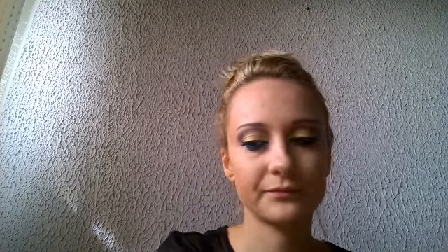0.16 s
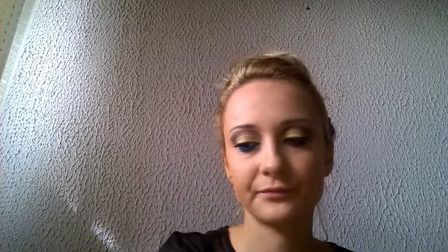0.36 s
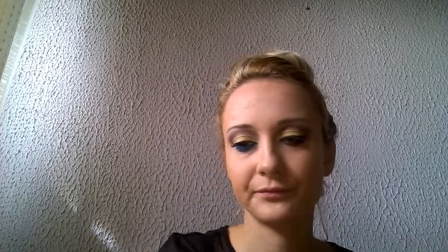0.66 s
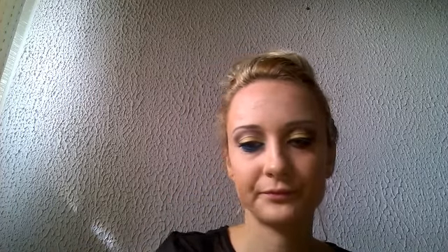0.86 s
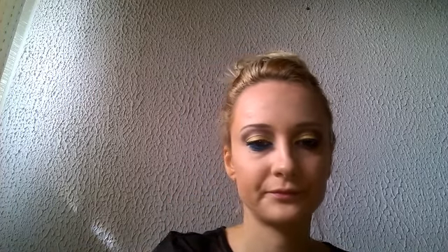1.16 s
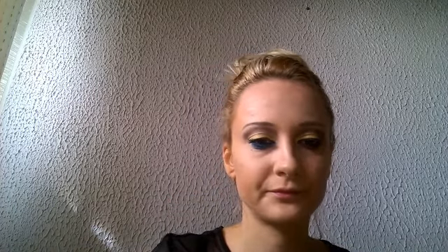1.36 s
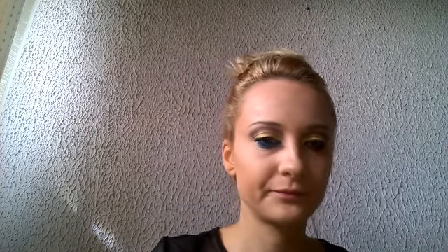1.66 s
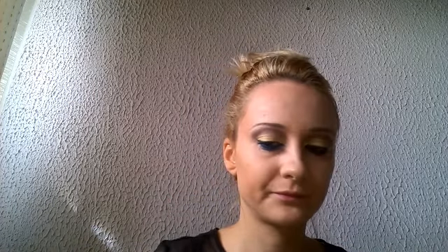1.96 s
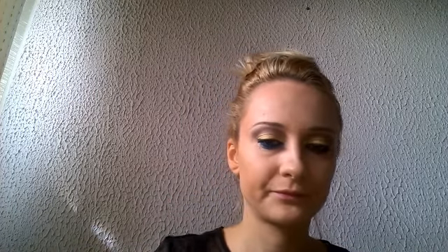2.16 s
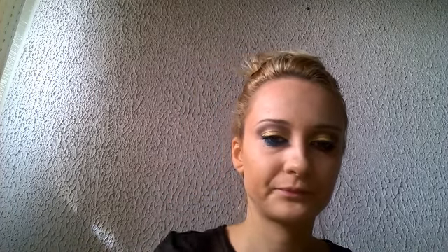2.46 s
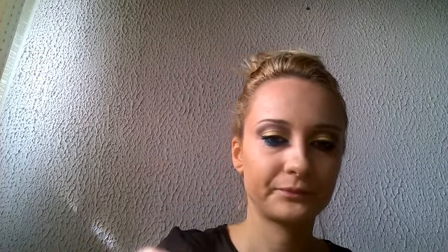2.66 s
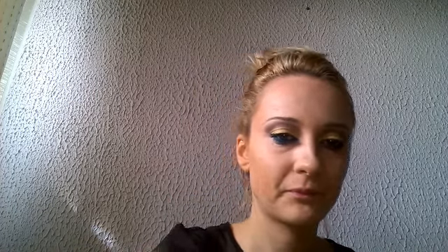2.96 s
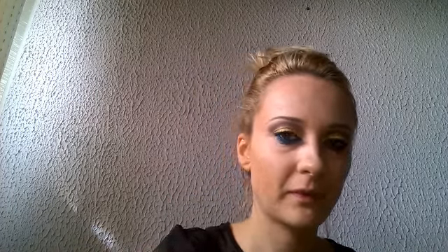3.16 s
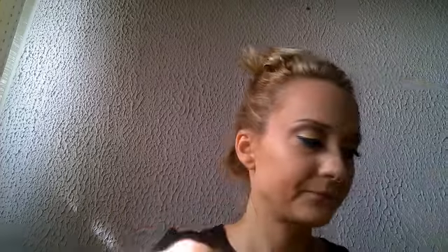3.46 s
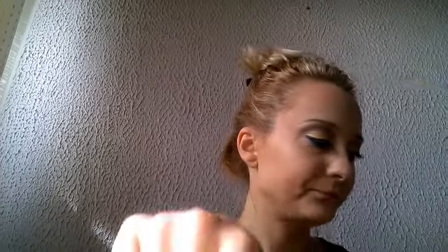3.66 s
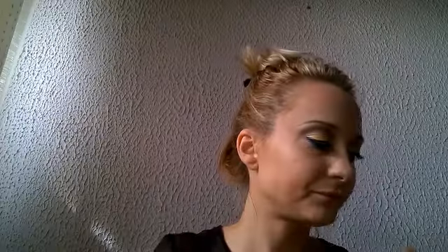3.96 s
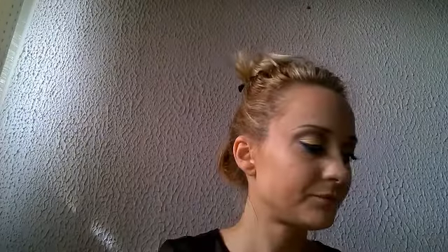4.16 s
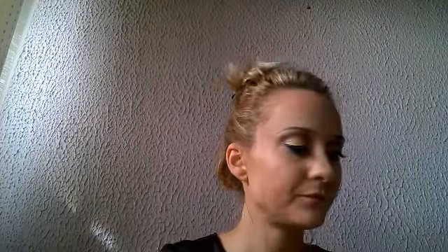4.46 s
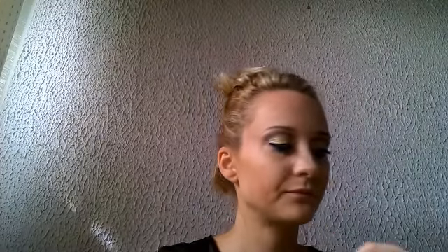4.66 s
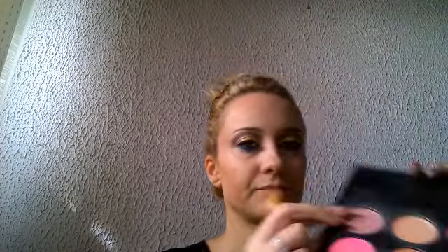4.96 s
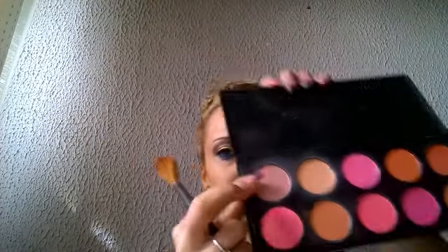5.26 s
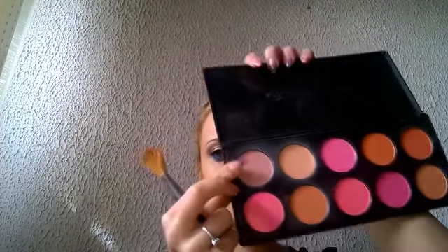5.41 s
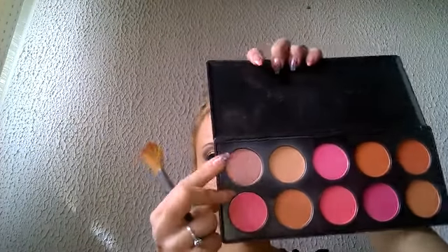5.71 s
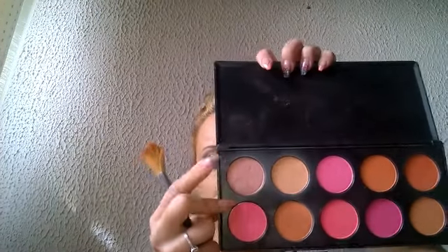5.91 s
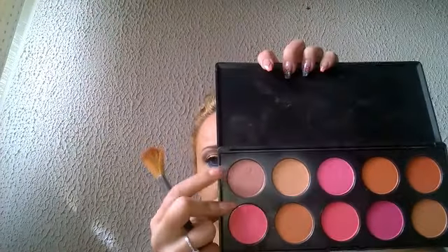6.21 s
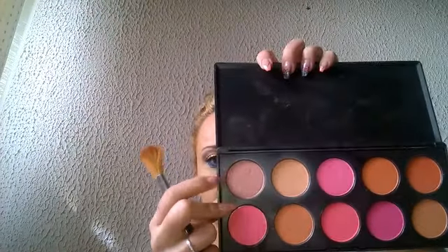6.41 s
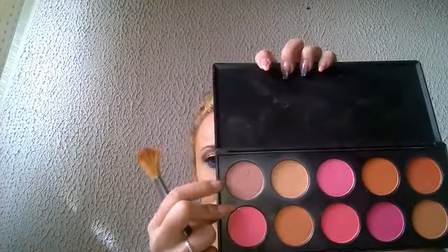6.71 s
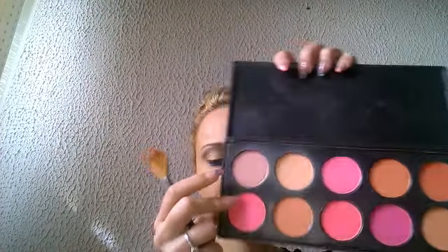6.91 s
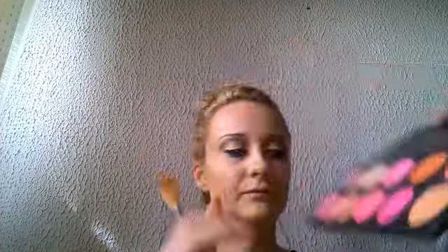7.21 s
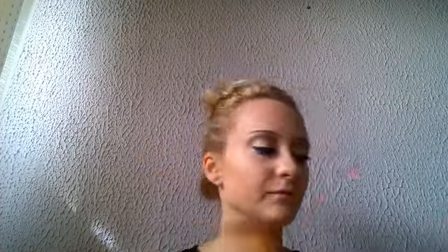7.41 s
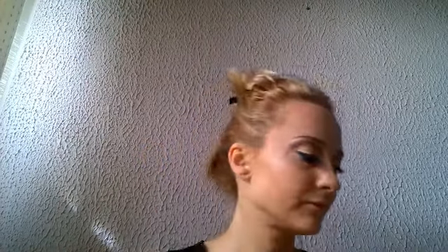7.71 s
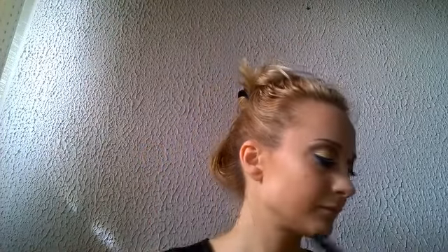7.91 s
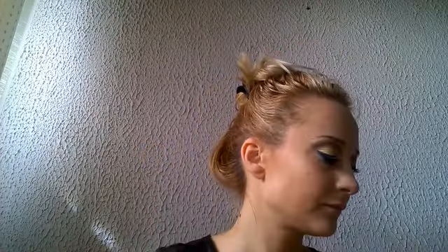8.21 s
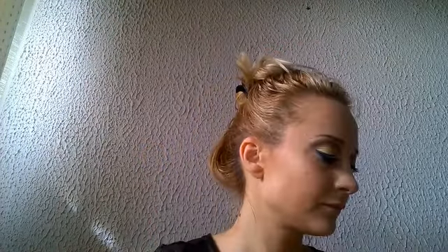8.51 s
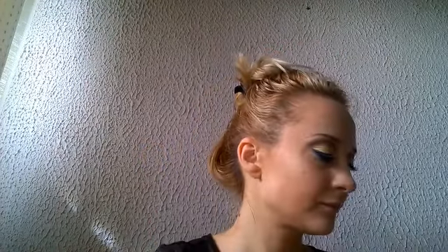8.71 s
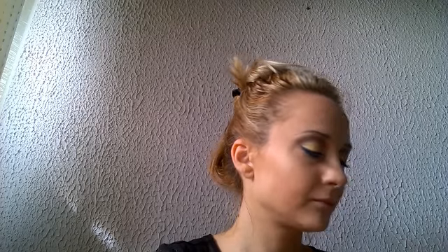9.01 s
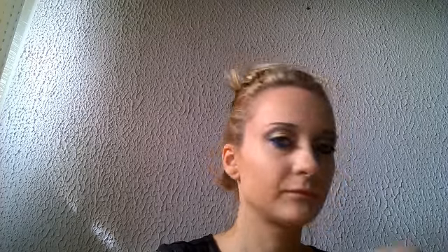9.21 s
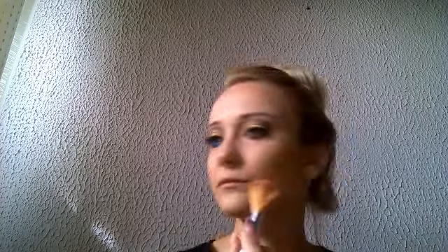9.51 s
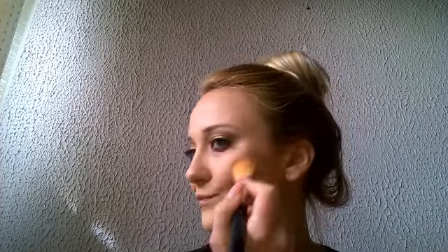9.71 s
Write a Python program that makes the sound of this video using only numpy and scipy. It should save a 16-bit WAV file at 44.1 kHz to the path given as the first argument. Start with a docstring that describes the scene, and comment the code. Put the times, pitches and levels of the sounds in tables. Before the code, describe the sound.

Hard plastic case knocks sharply on a desk, then light clicks, rattles and short scrapes of makeup items in a small quiet room, fading to soft shuffles.

```python
"""Small quiet room, at a desk: a plastic makeup palette and some brushes are handled. Hard case knocks, light
clicks and dull bumps are noise bursts with short decays; knocks add ringing sine modes. Slides are noise with
tiny catches, shuffles are dull noise, sways are low sine swells. All but the sways and the floor get dense,
decaying noise echoes; a faint wavering rumble and steady hiss lie below."""
import sys
import numpy as np
from scipy import signal
from scipy.fft import rfft, irfft
from scipy.io import wavfile

SR = 44100
rng = np.random.default_rng(int(sys.argv[2]) if len(sys.argv) > 2 else 0)


def master(y):
    """Save y as 16-bit WAV."""
    cut = np.clip(np.atleast_2d(y).T, -1, 1)
    pcm = np.round(cut * 32767)  # scale
    wavfile.write(sys.argv[1], SR, pcm.astype(np.int16))


N = 435266

SIZE = 2 ** 15   # samples per contact
AGE_S = np.arange(SIZE) / SR
HZ = np.maximum(np.fft.rfftfreq(SIZE, 1 / SR), 1)


def from_db(db):
    """Decibels to gain."""
    return 10 ** (np.asarray(db) / 20)


def rms_one(x):
    """Scale to an rms of 1."""
    return x / np.sqrt(np.mean(x ** 2) + 1e-20)


def at_hz(points, hz):
    """Read (Hz, value) points on a log-frequency axis."""
    point_hz, values = np.array(points).T
    return np.interp(np.log(hz), np.log(point_hz), values)


def dying(t60_s):
    """Exponential decay, 60 dB down after t60_s."""
    return np.exp(-np.log(1000) * AGE_S / max(t60_s, 1e-3))


def add(track, start_s, sound):
    """Mix a sound into the track at start_s."""
    start = max(round(start_s * SR), 0)
    track[start:start + len(sound)] += sound[:N - start]


def coloured(x, gain_db):
    """Minimum-phase filter with the given gain at each of HZ: nothing sounds early."""
    cepstrum = irfft(np.log(from_db(gain_db)))
    cepstrum[1:SIZE // 2] *= 2
    cepstrum[SIZE // 2 + 1:] = 0
    return irfft(rfft(x) * np.exp(rfft(cepstrum)))


def broad_db(x, count=12):
    """Spectrum level, averaged over about 1 / count of each frequency to either side."""
    total = np.cumsum(np.abs(rfft(x)) ** 2)
    k = np.arange(len(HZ))
    low = np.maximum(k - k // count - 20, 0)
    high = np.minimum(k + k // count + 20, k[-1])
    return 10 * np.log10((total[high] - total[low]) / (high - low) + 1e-12)


def peaks_db(resonances):
    """Gain at each of HZ of resonances (Hz, width in Hz, dB) that stand out of an even response."""
    power = 1
    for hz, width_hz, db in resonances:
        height = from_db(max(db, 0)) ** 2 - 1
        power = power + height / (1 + (2 * (HZ - hz) / width_hz) ** 2)
    return 10 * np.log10(power)


def spot_db(low_hz, middle_hz, high_hz, height_db):
    """The spot that is struck favours three damped resonances of the part."""
    return peaks_db([(hz, hz / 12, height_db) for hz in (low_hz, middle_hz, high_hz)])


def touch_db(thud_db, hollow_db, snap_db):
    """Where and how hard plastic is touched sets its bass, its hollow middle and its treble."""
    return at_hz([(260, thud_db), (750, hollow_db), (1700, 0), (3600, 0), (7000, snap_db)], HZ)


def soft_db(dull_hz, low_hz=105):
    """A soft contact only moves the low range of the desk."""
    return -10 * np.log10((1 + (HZ / dull_hz) ** 6) * (1 + (low_hz / HZ) ** 6))


def crack(t60_s, tick, treble_hz=4500, treble_share=.55):
    """A first tick, then crowded modes of a small part, the high ones dying first; spectrum flattened."""
    noise = rng.standard_normal(SIZE)
    low = signal.sosfilt(signal.butter(2, treble_hz, fs=SR, output="sos"), noise)
    high = signal.sosfilt(signal.butter(2, treble_hz, "high", fs=SR, output="sos"), noise)
    burst = low * dying(t60_s) - high * dying(t60_s * treble_share)
    burst /= np.linalg.norm(burst)
    burst[0] += tick
    return coloured(burst, -broad_db(burst))


def stroke(length_s, edge=0.23):
    """A movement swells, holds and fades, silent after 1.1 of length_s."""
    share = AGE_S / max(length_s, .01)
    return np.sqrt(np.clip(np.minimum(share, 1.1 - share) / edge, 0, 1))


# Rumble and hiss spectrum. Each row: frequency in Hz, relative density in dB.
FLOOR_SPECTRUM = [(20, -6), (50, -0.5), (70, -9), (100, -18.5), (190, -17), (350, -23.5), (550, -30),
                  (900, -30.5), (2000, -33.5), (4000, -35), (9000, -36), (12600, -35.5), (16000, -39)]


def floor(level_db=-59, waver_db=0.84, rumble_hz=400):
    """Steady hiss over a low rumble that wavers: shaped noise, its low share slowly modulated."""
    hz = np.maximum(np.fft.rfftfreq(N, 1 / SR), 1)
    spectrum = rfft(rng.standard_normal(N)) * from_db(at_hz(FLOOR_SPECTRUM, hz)) * (hz > 15)
    low_share = 1 / (1 + (hz / rumble_hz) ** 4)
    knots = rng.standard_normal(size=80)
    waver = from_db(waver_db * np.interp(np.arange(N), np.linspace(0, N, len(knots)), knots))
    rumble = irfft(spectrum * low_share, N) * waver
    hiss = irfft(spectrum * (1 - low_share), N)
    return from_db(level_db) * rms_one(rumble + hiss)


# Room decay. Each row: frequency in Hz, t60 in s.
ROOM_DECAY = [(100, 0.18), (260, 0.4155), (700, 0.06), (1900, 0.3357), (4800, 0.2164), (12800, 0.35)]
# Echo spectrum. Each row: frequency in Hz, relative level in dB.
ECHO_SPECTRUM = [(100, 1.5), (250, -3), (700, -6.5), (2000, -6.5), (4500, -9), (8000, -9), (14000, -13.5)]
# Standing waves between the walls. Each row: frequency in Hz, width in Hz, height in dB.
STANDING_WAVES = [(175, 61, 5.5), (236, 6.1, 6), (350, 16.17, 1.5), (448.6, 18, 2)]


def room(first_echo_s=0.0032, build_s=0.0069):
    """The room's answer to a click: dense echoes build up in milliseconds, each band with its own decay."""
    edges_hz = np.geomspace(60, 17000, 9)
    tail = np.zeros(SIZE)
    for low_hz, high_hz in zip(edges_hz, edges_hz[1:]):
        band_pass = signal.butter(2, [low_hz, high_hz], "band", fs=SR, output="sos")
        band = signal.sosfilt(band_pass, rng.standard_normal(SIZE))
        tail += band * dying(at_hz(ROOM_DECAY, np.sqrt(low_hz * high_hz)))
    tail *= np.clip((AGE_S - first_echo_s) / build_s, 0, 1)
    return coloured(tail, at_hz(ECHO_SPECTRUM, HZ) + peaks_db(STANDING_WAVES) - broad_db(tail))


def in_room(x, wet_db):
    """Direct sound plus its echoes, drawn afresh at each call."""
    return x + from_db(wet_db) * signal.fftconvolve(x, room())[:len(x)]


def chatter(blow, rattle_db=-13, rattle_t60_s=0.18, count=7):
    """Lid and pans are loose: after a hard blow they touch again several times, ever more weakly."""
    out = blow.copy()
    for delay_s in np.cumsum(rng.uniform(.003, .011, count)):
        touch = crack(t60_s=0.0061, tick=0.44)[:SIZE // 2]
        add(out, delay_s, from_db(rattle_db - 60 * delay_s / rattle_t60_s) * touch)
    return out


# Modes of case and desk. Each row: frequency in Hz, relative level in dB, t60 in s.
MODES = [(238.3, -59.5, 0.19), (880, -54, 0.18), (1138, -50, 0.18), (1190, -56, 0.18), (1680, -53.5, .16),
         (1900, -61, .2), (2080, -55, .21), (2250, -52, 0.23), (2612, -58, .2), (2969, -62.5, .19),
         (3270, -58.5, 0.14), (3430, -56.5, 0.18), (4130, -57.5, .16)]
# Heavy contact spectrum. Each row: frequency in Hz, relative level in dB.
HEAVY_SPECTRUM = [(30, -25), (80, -10.5), (130, 2.5), (700, 0.5), (2100, 2.5), (3200, -0.5), (4300, -6.5),
                  (5500, -15.5), (7000, -23.5), (9000, -22.5), (12000, -26.5), (16000, -35)]
HEAVY_SNAP_DB = -22   # snap already in that spectrum
# Case knocks on the desk. Each row: start in s, relative level in dB, thud in dB, hollowness in dB,
# snap in dB, ring t60 in s, three resonances in Hz, their height in dB.
CASE_KNOCKS = [(0.2042, 24.5, -7, -2.5, -23, 0.032, 876, 2072, 4000, 5),
               (0.407, -11, 9.5, 6.5, -17, 0.037, 720, 1630, 1700, 12.3),
               (0.5196, 3.5, 9, 10, -9.5, 0.041, 580, 1790, 3020, 5.3),
               (2.3721, 21.5, -3, -2, -26, 0.039, 1134, 2080, 3100, 4),
               (2.5235, 17.5, 5.5, 8, -15, .046, 242, 750, 1672, 7),
               (2.5604, 17, -4.5, 0.5, -24.5, 0.032, 1200, 1670, 2080, 4.3),
               (8.6933, -8.5, 3, 8.5, -12.5, 0.04, 740, 3460, 5600, 8.2)]


def knocks(room_db=-1.05):
    """Each knock cracks, rattles and rings case and desk; each lands elsewhere, with echoes of its own."""
    out = np.zeros(N)
    modes = np.array([from_db(db) * np.sin(2 * np.pi * hz * AGE_S) * dying(t60_s)
                      for hz, db, t60_s in MODES])
    for start_s, level_db, thud_db, hollow_db, snap_db, t60_s, *spot in CASE_KNOCKS:
        strengths = from_db(rng.normal(-3.0, 1.7, len(modes))) * rng.choice([-1, 1], len(modes))
        rattle = chatter(crack(t60_s, tick=.2))
        blow = coloured(rattle, -broad_db(rattle)) + strengths @ modes
        touch = touch_db(thud_db, hollow_db, snap_db - HEAVY_SNAP_DB)
        colour_db = at_hz(HEAVY_SPECTRUM, HZ) + touch + spot_db(*spot)
        add(out, start_s, in_room(coloured(blow, level_db + colour_db), room_db))
    return out


# Soft bumps on the desk, some the low thump under a case knock. Each row: start in s, relative level in dB.
DESK_BUMPS = [(0.523, 10.5), (1.004, 1), (1.121, -0.5), (2.917, 4.5), (4.167, 0), (5.939, -0.5),
              (7.365, -7), (8.70, -1)]


def bumps(dull_hz=169):
    """The desk top is bumped, alone or under a knock: a short burst with only its low range left."""
    out = np.zeros(N)
    for start_s, level_db in DESK_BUMPS:
        add(out, start_s, coloured(crack(t60_s=0.064, tick=1.0), level_db + soft_db(dull_hz)))
    return out


# Sways of the desk. Each row: start in s, length in s, frequency in Hz, level in dB.
DESK_SWAYS = [(0.637, 0.24, 31.5, -44), (4.325, .1, 63, -48), (7.997, 0.19, 52.5, -54.5),
              (8.796, 0.17, 32, -48.5)]


def sway():
    """The swaying desk shakes the microphone directly: a low sine under a half-sine swell."""
    out = np.zeros(N)
    for start_s, length_s, hz, level_db in DESK_SWAYS:
        swell = np.sin(np.pi * np.minimum(AGE_S / length_s, 1))
        add(out, start_s, from_db(level_db) * np.sin(2 * np.pi * hz * AGE_S) * swell)
    return out


# Light contact spectrum. Each row: frequency in Hz, relative level in dB.
LIGHT_SPECTRUM = [(30, -17), (80, -8.5), (140, 3), (700, 1.5), (1800, 2), (3000, -0.5), (4300, -3.5),
                  (6000, -8), (9000, -11.5), (12000, -11), (16000, -15.5)]
LIGHT_SNAP_DB = -12   # snap already in that spectrum
# Broad resonances of the thin plastic shell. Each row: frequency in Hz, width in Hz, height in dB.
SHELL_RESONANCES = [(940, 310, 2), (1890, 310, 1.5), (2930, 180, 2.5), (3864, 350, 3), (5050, 420, 3),
                    (7900, 580, 2), (11100, 2080, 1)]


def light_shell_db():
    """A light contact excites the broad resonances of the thin shell."""
    return at_hz(LIGHT_SPECTRUM, HZ) + peaks_db(SHELL_RESONANCES)


# Sound of each touched part. Each entry: thud in dB, hollowness in dB, snap in dB, ring t60 in s,
# three resonances in Hz, their height in dB.
TOUCHED_PARTS = {"nail": (3, 3.5, 5.5, 0.18, 7700, 10301, 12600, 4.5),
                 "lid": (-13, -5, -10, 0.07, 1879.5, 3050, 4981.5, 6.5),
                 "hinge": (-14, 1, -12, 0.03, 2600, 3250, 3900, 8),
                 "handle": (8.5, -2, -6.5, 0.13, 852, 2702, 3550, 10.5),
                 "rim": (-0.5, 1.5, -18, 0.08, 830, 1856, 2850, 6),
                 "tray": (6, 12, -15, 0.18, 734, 900, 1200, 6.5),
                 "base": (6.5, -1, -28, .06, 1140, 1830.5, 3550, 7)}
# Light clicks. Each row: start in s, relative level in dB, extra snap of a sharper touch in dB, part.
LIGHT_CLICKS = [(.988, -17.5, -14, "handle"), (0.9984, -3, 0, "handle"), (1.1223, -18, 3, "tray"),
                (1.163, -12.5, 7, "base"), (1.2356, -20, 7, "tray"), (1.327, -22.5, 4, "rim"),
                (1.3989, -18.5, 3, "rim"), (2.229, -17.5, -5, "base"), (2.272, -11, 3, "lid"),
                (2.8314, -7.5, -1, "hinge"), (2.8533, -11, -2, "handle"), (2.869, -10.5, 3, "handle"),
                (2.8901, -15, -3, "hinge"), (2.905, -17, 8.5, "tray"), (3.0482, -4.5, 4, "rim"),
                (3.0922, -15.5, 5, "hinge"), (3.1485, -9.5, 6, "base"), (3.3128, -7.5, 3, "base"),
                (3.4065, 0, -1, "hinge"), (3.4346, -3, -1, "rim"), (3.448, -22, 4.5, "handle"),
                (3.5078, -13, 2, "rim"), (3.742, -7, -8, "nail"), (4.137, -24.5, 0, "tray"),
                (4.254, -29, -8, "tray"), (4.466, -12, -2, "rim"), (5.512, -20, -9, "hinge"),
                (5.597, -29, -8, "tray"), (6.5868, -6.5, 2, "lid"), (6.754, -9.5, 0.5, "lid"),
                (6.955, -22.5, 3, "hinge"), (7.065, -22, -11, "rim"), (7.691, -31.5, 4, "nail"),
                (7.93, -36.5, 2, "nail"), (8.322, -25, -1.5, "nail"), (8.345, -27.5, 12, "tray"),
                (8.535, -25.5, 4, "tray"), (9.428, -33.5, 3, "nail")]


def clicks():
    """Light contacts leave the desk still; the part that is touched sets colour and ring."""
    out = np.zeros(N)
    shell_db = light_shell_db()
    for start_s, level_db, sharper_db, part in LIGHT_CLICKS:
        thud_db, hollow_db, snap_db, t60_s, *spot = TOUCHED_PARTS[part]
        touch = touch_db(thud_db, hollow_db, snap_db + sharper_db - LIGHT_SNAP_DB)
        colour_db = shell_db + touch + spot_db(*spot)
        add(out, start_s, coloured(crack(t60_s, tick=0.38), level_db + colour_db))
    return out


# An edge scrapes thinly, a flat face rubs hollowly. Each entry: thud in dB, hollowness in dB,
# snap in dB, height of the favoured resonance in dB.
RUBBING_GRIPS = {"edge": (6.5, 4, -11.5, 8.5), "face": (11, 8, -22, 10.5), "finger": (-5, 3.5, -9.5, 7)}
# Plastic slides over desk and skin. Each row: start in s, length in s, relative level in dB,
# favoured resonance in Hz, what rubs.
PLASTIC_SLIDES = [(1.099, .16, -53.5, 1210, "face"), (1.237, 0.078, -52.5, 550, "face"),
                  (1.331, 0.077, -54, 1790, "face"), (2.849, 0.065, -51.5, 860, "face"),
                  (2.99, 0.091, -48, 2860, "edge"), (3.08, 0.089, -46.5, 1220, "face"),
                  (3.248, 0.076, -45.5, 5160, "edge"), (3.41, 0.022, -41.5, 1160, "face"),
                  (3.469, 0.17, -51.5, 2850, "edge"), (3.638, 0.063, -46, 1660, "face"),
                  (3.96, .13, -55.5, 2000, "finger"), (4.381, 0.073, -53, 744, "face"),
                  (4.469, 0.042, -52, 2300, "finger"), (4.752, 0.063, -51.5, 1900, "finger"),
                  (4.99, 0.095, -53, 1600, "finger"), (5.572, .22, -61, 3700, "edge"),
                  (6.907, 0.18, -60.5, 1900, "finger"), (8.489, .085, -54.5, 2890, "edge")]


def slides(catches_per_s=220, spread_db=4.5, smooth=0.92, width_share=0.19):
    """Friction: a smooth rub and tiny uneven catches; each stroke favours one resonance of the shell."""
    out = np.zeros(N)
    shell_db = light_shell_db()
    for start_s, length_s, level_db, hz, grip in PLASTIC_SLIDES:
        thud_db, hollow_db, snap_db, height_db = RUBBING_GRIPS[grip]
        sizes = from_db(spread_db * np.minimum(rng.exponential(1, SIZE), 3))
        catches = (rng.random(SIZE) < catches_per_s / SR) * sizes * rng.choice([-1, 1], SIZE)
        friction = rms_one(rms_one(catches) + smooth * rng.standard_normal(SIZE))
        touch = touch_db(thud_db, hollow_db, snap_db - LIGHT_SNAP_DB)
        colour_db = shell_db + touch + peaks_db([(hz, hz * width_share, height_db)])
        add(out, start_s, coloured(friction * stroke(length_s), level_db + colour_db))
    return out


# Dull shuffles as the sitter shifts. Each row: start in s, length in s, relative level in dB.
SITTER_SHUFFLES = [(4.8, 0.13, -52), (5.972, 0.081, -48), (6.298, 0.32, -51), (6.752, 0.27, -57),
                   (7.318, .14, -55), (7.508, 0.074, -42), (9.251, .171, -51), (9.679, 0.19, -44.5)]


def shuffles(dull_hz=294, low_hz=139):
    """Shuffles pass through the desk top: swelling noise with only its low range left."""
    out = np.zeros(N)
    for start_s, length_s, level_db in SITTER_SHUFFLES:
        rub = rng.standard_normal(SIZE) * stroke(length_s)
        add(out, start_s, coloured(rub, level_db + soft_db(dull_hz, low_hz)))
    return out


def scene():
    """Knocks, light handling and dull desk sounds with echoes; sway and floor without."""
    handling = in_room(from_db(-1.38) * clicks() + from_db(-3.0) * slides(), wet_db=-1.1)
    desk = in_room(from_db(3.5) * (bumps() + shuffles()), wet_db=3.0)
    return (from_db(-1.5) * knocks() + handling + desk + sway() + floor())[None]


def record(dry, top=0.9, cutoff_hz=16000):
    """The loudest peaks are rounded and the top of the spectrum is cut."""
    rounded = top * np.tanh(dry / top)
    return signal.sosfilt(signal.ellip(10, .1, 70, cutoff_hz, fs=SR, output="sos"), rounded)


dry = scene()
out = record(dry)
master(out)
```